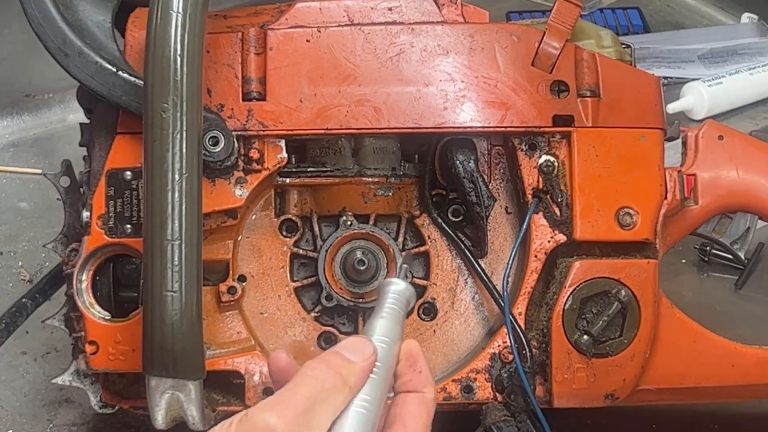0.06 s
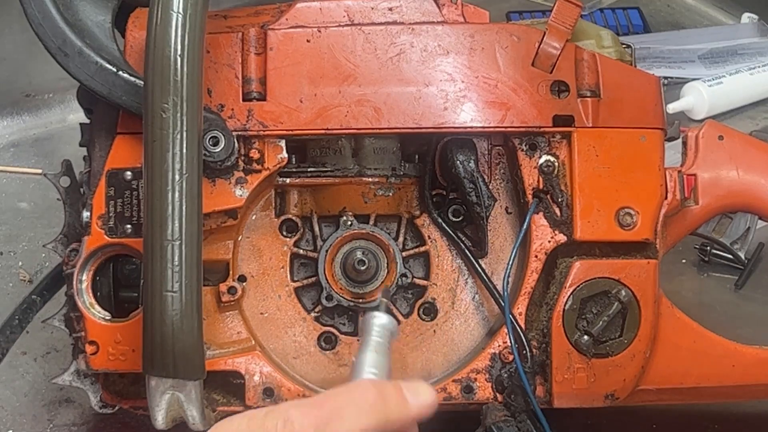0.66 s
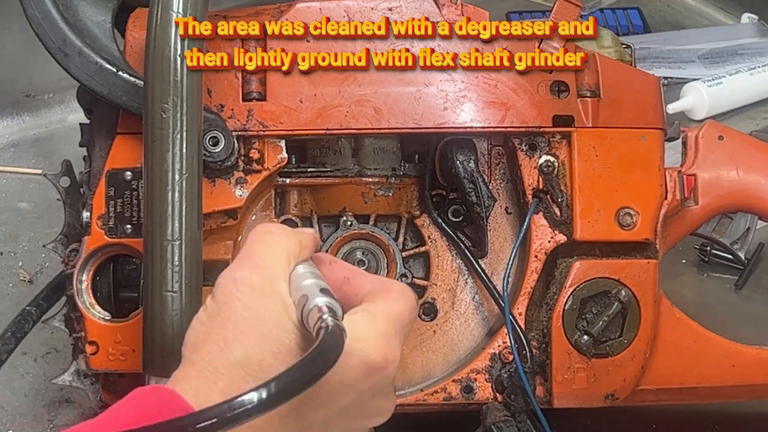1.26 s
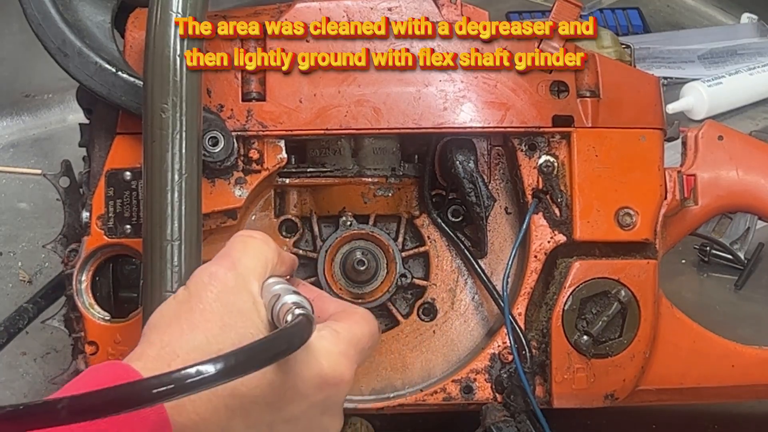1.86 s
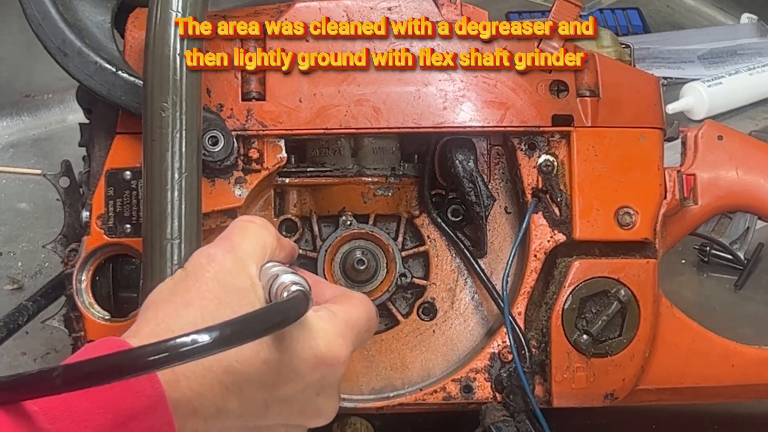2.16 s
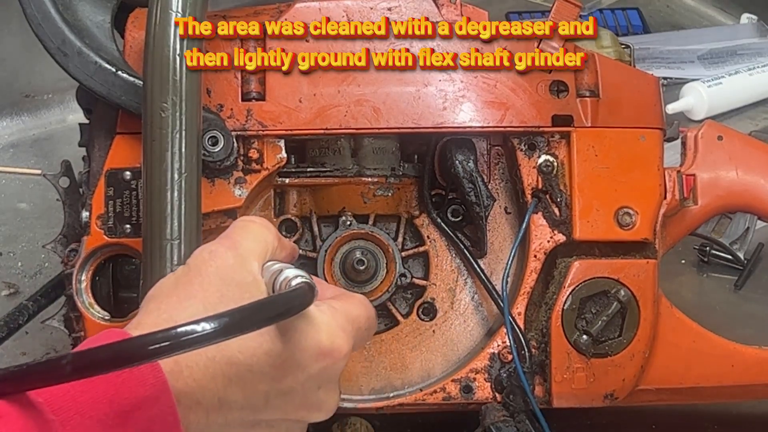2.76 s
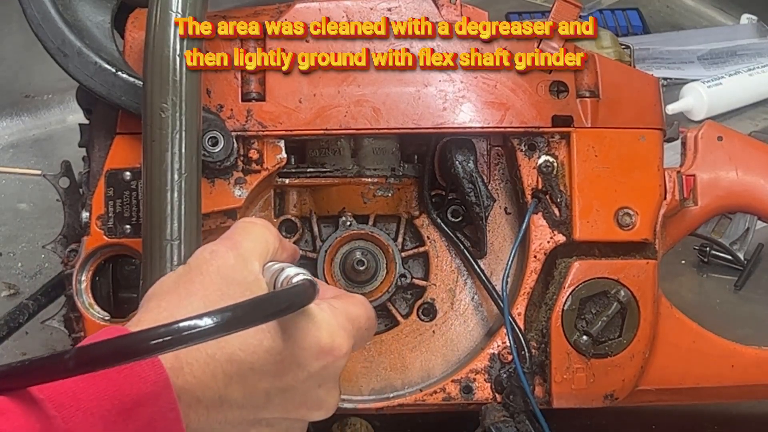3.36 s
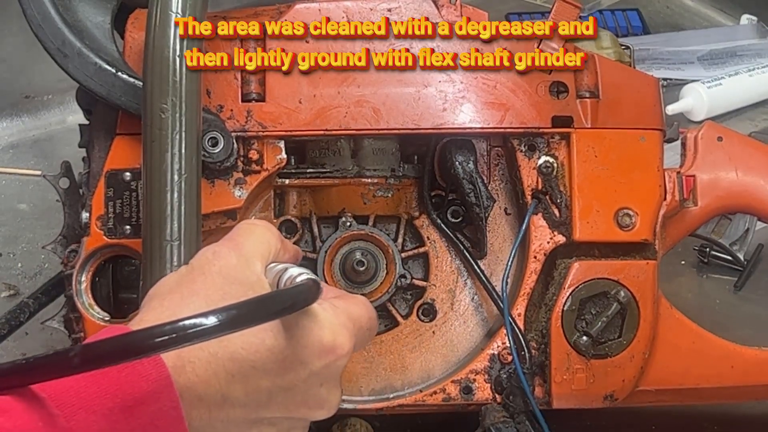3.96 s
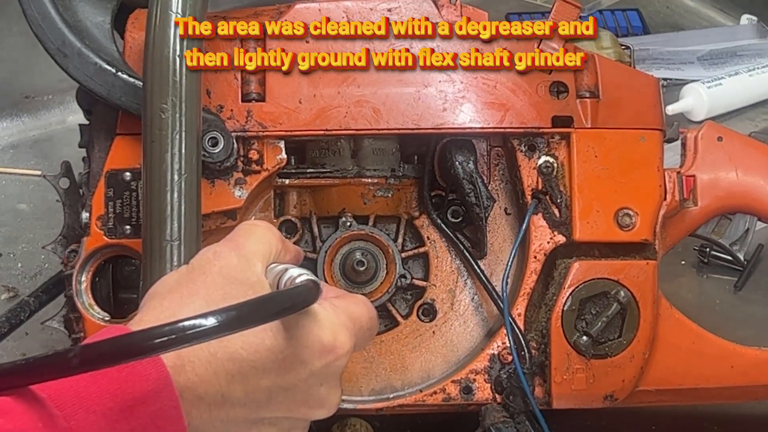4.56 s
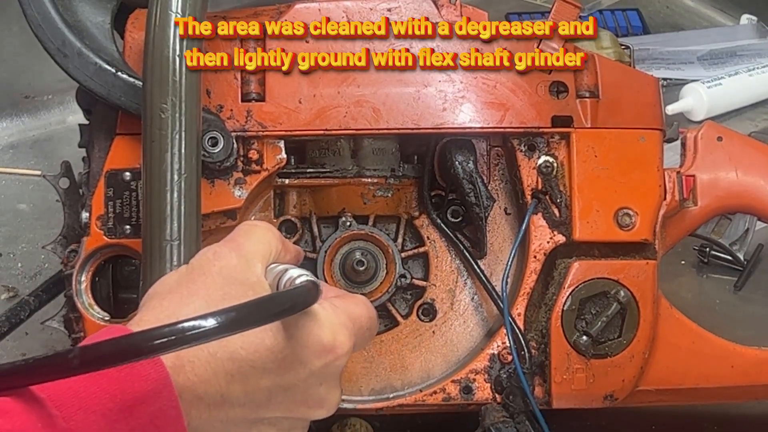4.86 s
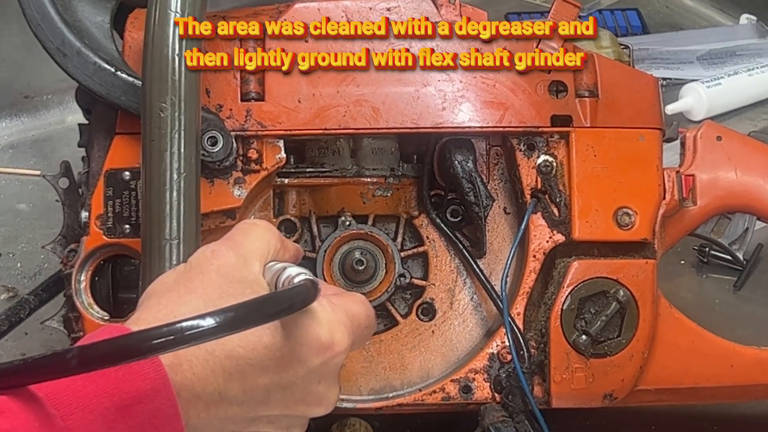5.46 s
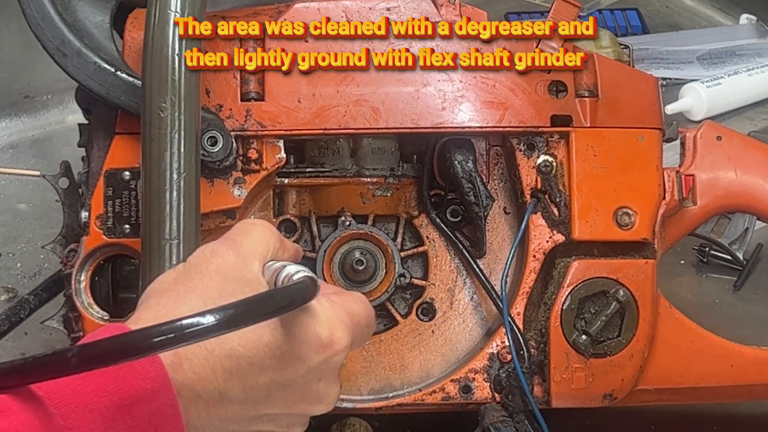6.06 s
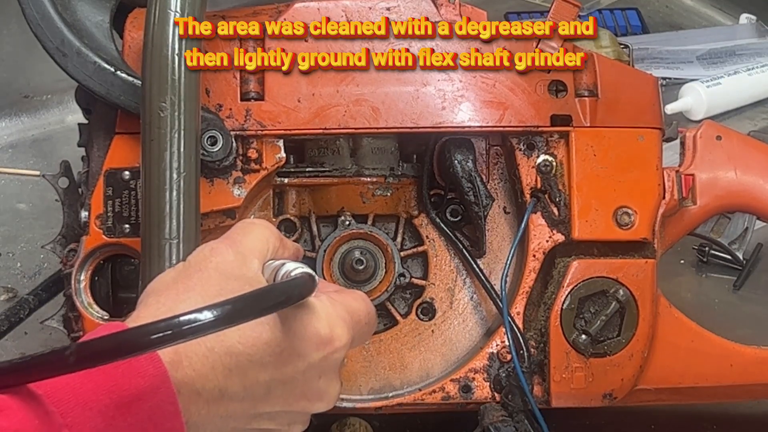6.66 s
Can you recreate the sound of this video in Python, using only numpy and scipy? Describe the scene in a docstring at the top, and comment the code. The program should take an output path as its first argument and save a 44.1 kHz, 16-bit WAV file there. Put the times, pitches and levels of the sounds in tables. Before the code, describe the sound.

In a small workshop, the electric motor of a flexible-shaft grinder coasts down briefly, then picks up to a steady high whine, with a raspy cable and rushing fan air. Its burr skims a chainsaw's metal crankcase, catching now and then, and near the end bites harder with chattering, ringing scrapes and a thin sizzle. The tool sounds close, over a faint low room rumble.

```python
"""A motor's whine sags as it coasts, then picks up and runs on: a pedal-driven flexible-shaft grinder
is cleaning a chainsaw's metal crankcase in a small workshop. Slots and commutator bars sing with the
shaft, the cable rasps in its sheath and the fan blows. The burr skims the casting, then chatters and
sizzles as it bites harder. A low rumble lies under it all."""
import sys
import numpy as np
from scipy import signal
from scipy.fft import rfft, irfft, next_fast_len
from scipy.io import wavfile
from scipy.ndimage import uniform_filter1d, map_coordinates

SR = 44100
rng = np.random.default_rng(int(sys.argv[2]) if len(sys.argv) > 2 else 0)


def dump(signal):
    """Clip the signal to [-1, 1] and save it as 16-bit WAV at the path in sys.argv[1]."""
    limited = np.clip(np.atleast_2d(signal).T, -1, 1)
    pcm = np.round(limited * 32767).astype(np.int16)
    wavfile.write(sys.argv[1], SR, pcm)


N = 295911

# The pedal's moves. Each row: time in seconds, speed in turns a second.
PEDAL = [(0.0, 146.6), (0.24, 120.27), (0.51, 103.45), (0.84, 142.67), (1.37, 189.0), (1.8, 199.42),
         (2.21, 232.95), (2.74, 238.92), (3.18, 222.26), (3.46, 213.05), (3.85, 206.08), (4.33, 212.77),
         (4.8, 224.79), (5.6, 238.16), (6.12, 243.41), (6.3, 242.95), (6.71, 247.02)]
def shaft():
    """Speed and angle of the rotor, whose inertia rounds off each pedal move."""
    inertia_s = .12
    speed = uniform_filter1d(curves(PEDAL)[0], int(inertia_s * SR), mode="nearest")
    return speed, 2 * np.pi * np.cumsum(speed * (1 + 0.0004 * wobble(12))) / SR


# EQ on the hum. Each row: frequency in Hz, gain in dB.
HUM_EQ = [(115, -14), (132, -8), (143, 0), (250, 0)]
def motor(angle, speed):
    """Unbalance hums once a turn, under the whine of the slots and the commutator."""
    power = ramp(start_s=0.35, length_s=0.15)  # coasting until the current comes back
    hum = amp(by_speed(speed, -50, per_doubling=10.6)) * whine(angle, flutter_db=0, blur=.03)
    singing = power * slots(angle) + commutator(angle, speed) + overtones(angle, speed)
    return filtered(hum, shape(HUM_EQ)) + walls(singing, wet_db=-18, t60=0.11)


# Fader ride on the slot whine. Each row: time in seconds, level in dB.
SLOT_FADER = [(0.5, -35), (0.9, -39.5), (1.3, -38.7), (1.7, -40.5), (2.02, -36.5), (2.3, -41), (2.7, -37.5),
              (2.9, -42.5), (3.3, -42.5), (3.7, -41.5), (4.1, -39.5), (4.5, -39), (4.75, -40), (5.1, -39),
              (5.5, -39), (6.71, -40)]
# The tones of the throb. Each row: offset in multiples of twice the mains rate, relative level in dB.
THROB_TONES = [(-1, -3), (0, 0), (1, -3.5), (2, -10)]
# How well the motor radiates this whine. Each row: frequency in Hz, gain in dB.
SLOT_EQ = [(1400, -24), (1700, -16.5), (1810, 3.5), (1900, -8), (2100, 0.5), (2380, 2.5), (2430, -2.5),
           (2480, 2), (2600, 2), (2700, 0), (2800, -4), (3000, -8)]
def slots(angle):
    """Twelve armature slots whine, throbbing unevenly with each half wave of the mains."""
    mains_hz = 60
    level_db, = curves(SLOT_FADER)
    passing = 12 * angle + .22 * wobble(260)  # the shaft judders
    half_wave = 2 * np.pi * 2 * mains_hz * np.arange(N) / SR
    tone = sum(amp(db) * whine(passing + k * half_wave, flutter_db=1.4, blur=.17)
               for k, db in THROB_TONES)
    return amp(level_db + 0.33 * wobble(11)) * filtered(unit(tone), shape(SLOT_EQ))


# Peaks and nulls of the motor's shell. Each row: centre in Hz, width in Hz, lift in dB.
SHELL_PEAKS = [(2560, 200, 2.5), (2740, 90, -9), (2950, 120, -9), (3380, 160, 2), (3620, 200, -4),
               (3990, 350, 4), (4430, 130, -7), (4620, 170, 8), (4995, 35, -7), (5150, 190, 4),
               (5340, 45, -9), (5440, 140, 6), (5530, 35, -10), (5615, 90, 5), (5678, 25, -4),
               (5728, 80, 8), (5792, 60, 10.5), (5850, 70, 7), (5930, 90, 10)]
# EQ on the commutator. Each row: frequency in Hz, gain in dB.
BAR_EQ = [(2400, -1.5), (3400, -1.5), (3900, 1), (4600, 0), (4830, -6), (5080, 1), (5400, 1), (5750, 0),
          (6150, 3), (6600, -4), (7100, 0), (8200, -2), (9200, -4), (10500, -2), (12200, 2), (14500, -3)]
def commutator(angle, speed):
    """Twenty-four bars whine under the brushes, swelling and fading as the pitch crosses resonances."""
    bars, bar_hz = 24 * angle, 24 * speed
    shell_db = sum(db * bell(bar_hz, hz, width) for hz, width, db in SHELL_PEAKS)
    bar_db = by_speed(speed, -46.7, per_doubling=2.8) + shell_db
    # at low speed each bar clicks, both straight through the air and through the handpiece
    slow = np.clip((240 - speed) / 100, 0, 1)
    click_db, direct_db = -47, -4
    clicks = sum(amp(db) * amp(2.5 * wobble(65)) * whine(k * bars, flutter_db=2.4, blur=1.0)
                 for k, db in [(2, 0), (3, -9)])
    clicks = filtered(slow * clicks, lambda hz: np.hypot(amp(direct_db), abs(modes(HANDPIECE_MODES, hz))))
    # running out of true adds a tone one order lower and presses the brushes harder once a turn
    side = .45 * slow * whine(bars - angle, flutter_db=2, blur=.35)
    pressure = 1 + (.22 + .25 * slow) * np.cos(angle)
    tone = whine(bars, flutter_db=2, blur=0.15 + .14 * slow)
    return filtered(pressure * (amp(bar_db) * (tone + side) + amp(click_db) * clicks), shape(BAR_EQ))


# A thin sheen on the whine. Each row: multiple of the shaft rate, level in dB before EQ.
SHAFT_OVERTONES = [(8, -55.5), (9, -49), (10, -59), (11, -67), (19, -46.5), (21, -47), (23, -54)]
# EQ on that sheen. Each row: frequency in Hz, gain in dB.
OVERTONE_EQ = [(1740, -10), (1810, 0), (1860, -10), (1930, 3.5), (2010, -7), (2130, 1), (2400, 1),
               (3800, -9), (4300, -6), (4530, 2.5), (4720, -5), (5080, 0.5), (5400, 1), (5750, 0)]
def overtones(angle, speed):
    """Faint overtones of the shaft come forward as it speeds up."""
    tones = sum(amp(db) * whine(round(k) * angle, flutter_db=2, blur=.3) for k, db in SHAFT_OVERTONES)
    return filtered(tones * (speed / speed.max()) ** 3, shape(OVERTONE_EQ))


# The sheath's bright rasp. Each row: frequency in Hz, gain in dB.
SHEATH_EQ = [(1000, -19.5), (1750, -10), (2150, -3.5), (3250, -2), (3450, -8.5), (3650, -4.5), (4000, -5),
             (4300, -3), (4530, -3), (4730, -4.5), (5080, -1.5), (5300, -2), (6300, -0.5), (7200, -10.5),
             (7650, -14), (7950, -9.5), (8500, -17.5), (9800, -17), (12500, -24), (15500, -49)]
# The steel handpiece's ring. Each row: pitch in Hz, width in Hz, gain in dB.
HANDPIECE_MODES = [(4284, 40, -6.5), (4400, 110, -14), (5067, 78, -4), (5620, 81, 0.5), (5997, 220, 2),
                   (6174, 225, 1), (6437, 150, -2)]
def cable(angle, speed, bite_ring):
    """The wound core rubs its sheath and shakes the handpiece once a turn; strokes smear at speed."""
    depth = np.clip(1.3 * (speed.min() / speed) ** 1.1, 0, 1)
    stroke = depth * np.cos(angle + 0.12 * wobble(28))
    grip = amp(1.16 * wobble(500))  # the coils catch and slip
    rasp_db = by_speed(speed, -34.5, per_doubling=7.8) + 0.22 * wobble(19)
    rasp = amp(rasp_db) * rush(shape(SHEATH_EQ), (1 + 0.022 * stroke) * grip)
    whip_db = 4.5 * bell(speed, centre=182, width=41)  # near this speed the cable whips
    shake_db = by_speed(speed, -40.5, per_doubling=3.7) + whip_db
    recoil = amp(-0.5) * bite_ring  # bites kick back into the handpiece
    shake = np.hypot(amp(shake_db), recoil) * amp(1.6 * wobble(25))
    return rasp + shake * rush(lambda hz: modes(HANDPIECE_MODES, hz), (1 + stroke) * grip)


# The burr digs in. Each row: start and length in seconds, then scrape, ring and sizzle levels in dB.
BURR_BITES = [(2.1, 0.034, -39, -46, -56), (2.867, .15, -52, -51, -63), (3.31, 0.03, -35, -46, -62),
              (4.123, 0.24, -38, -48, -49), (4.276, .045, -34, -40, -54), (5.21, 0.16, -38, -37.5, -60),
              (5.39, 0.17, -38.5, -39.5, -65), (5.503, 0.11, -37, -33.5, -57),
              (5.633, 0.069, -33.5, -33.5, -52), (5.727, 0.08, -31, -37.5, -52),
              (5.837, 0.39, -43, -44, -55), (6.153, 0.046, -29.5, -37, -37), (6.22, 0.066, -32, -41, -45),
              (6.28, 0.058, -32.5, -41, -41)]
def bites():
    """Envelopes of scrape, ring and sizzle: each bite digs in, holds and lets go."""
    attack_s, release_s = 0.015, 0.036
    holds = np.array([ramp(s, attack_s) * (1 - ramp(s + length, release_s))
                      for s, length, *_ in BURR_BITES])
    gains = amp(np.array(BURR_BITES)[:, 2:].T)
    return np.sqrt(gains ** 2 @ holds ** 2)


# Sharp ticks on edges. Each row: start in seconds, scrape level in dB, ring level in dB.
EDGE_CATCHES = [(2.119, -28, -40), (4.225, -28, -38), (4.304, -22, -38), (4.324, -20, -39),
                (4.837, -27, -38), (5.033, -28, -38), (5.041, -29, -38), (5.283, -31, -33),
                (5.499, -25, -23), (5.564, -23, -29), (5.661, -32, -21), (5.674, -22, -28),
                (5.687, -19, -21.5), (5.7054, -24, -25), (5.720, -24, -22), (5.735, -26, -24),
                (5.749, -30, -25), (5.7755, -28, -29), (5.807, -25, -30), (6.166, -22, -31),
                (6.173, -23, -28), (6.182, -26, -30), (6.195, -20, -33), (6.209, -24, -32),
                (6.257, -19, -30), (6.282, -28, -34), (6.294, -24, -26), (6.308, -26, -32),
                (6.311, -26, -40), (6.319, -20, -37), (6.33, -22, -33), (6.3435, -20.5, -33)]
def catches():
    """Envelopes of scrape and ring: a quick jolt each time the burr catches an edge."""
    start_s, *levels_db = np.transpose(EDGE_CATCHES)
    return [bursts((start_s * SR).astype(int), amp(db), t60=0.015) for db in levels_db]


# The scrape of burr on metal. Each row: frequency in Hz, gain in dB.
SCRAPE_EQ = [(500, -35), (2000, -2), (3100, -28), (3600, -10), (4000, -4.5), (4500, -2), (4750, -4),
             (5100, 3), (5400, -4), (5700, 8), (6000, 7), (6200, -0.5), (6450, 4.5), (6800, -1),
             (7300, -5.5), (8000, -14), (9500, -1.5), (11500, -18), (14500, -44)]
# The crankcase's ring. Each row: pitch in Hz, width in Hz, gain in dB.
CRANKCASE_MODES = [(2080, 150, -1.5), (2305, 180, 2), (2630, 250, -17), (2810, 210, -6), (3020, 220, 2),
                   (3283, 240, 1.5), (3670, 160, -2), (4360, 200, -8.5)]
# The sizzle of chips. Each row: frequency in Hz, gain in dB.
SIZZLE_EQ = [(6000, -30), (7200, -2), (7900, 2), (8700, -3), (9500, 10), (10400, -4), (11500, 1.5),
             (12400, -20), (13500, -12), (14500, -6), (15500, -25)]
def burr(angle, bite_scrape, bite_ring, bite_sizzle):
    """The burr scrapes unevenly once a turn, ringing the casting and sizzling as chips tear off."""
    touch_s, skim_scrape_db, skim_ring_db, lean_db_per_s = 0.69, -51, -44, 1.5
    touch = ramp(touch_s, length_s=1)  # the burr settles on the casting
    lean_db = lean_db_per_s * (np.arange(N) / SR - touch_s)  # the hand leans in
    scraping = np.hypot(touch * amp(skim_scrape_db + lean_db), bite_scrape)
    ringing = np.hypot(touch * amp(skim_ring_db), bite_ring)
    turns = np.flatnonzero(np.diff(np.floor(angle / (2 * np.pi))))
    chatter = unit(0.88 + bursts(turns, rng.uniform(size=len(turns)), t60=0.021))
    catch_scrape, catch_ring = catches()
    scrape = np.hypot(scraping * amp(0.85 * wobble(60) + wobble(2500)) * chatter, catch_scrape)
    ring = np.hypot(ringing * amp(1.1 * wobble(70)) * chatter, catch_ring)
    chip_sizes = amp(4 * rng.standard_normal(len(turns)))  # one chip a turn
    chips = unit(bursts(turns, chip_sizes, t60=0.014))
    sizzle = np.hypot(bite_sizzle * chips, amp(-18.5) * catch_scrape)
    return (struck(shape(SCRAPE_EQ), scrape)
            + struck(lambda hz: modes(CRANKCASE_MODES, hz), ring)
            + struck(shape(SIZZLE_EQ), sizzle))


# The fan's breath. Each row: frequency in Hz, gain in dB.
AIR_EQ = [(60, -36), (150, -9.5), (210, -14), (275, -9), (330, -6.5), (430, -6), (570, -9.5), (670, 3),
          (860, -1), (980, 0), (1100, -13), (1350, -7.5), (1800, -11), (4000, -28)]
# The motor housing's hollow ring. Each row: pitch in Hz, width in Hz, gain in dB.
HOUSING_MODES = [(333, 67, -8), (707, 52, -15), (1002.5, 31, 0), (1170, 43, -4.5), (1613, 24, -1)]
def fan(speed):
    """Cooling air rushes through the motor and rings its housing."""
    level_db = by_speed(speed, -40, per_doubling=9.3) + 0.54 * wobble(8)
    air = rush(shape(AIR_EQ))
    housing = amp(-5) * rush(lambda hz: modes(HOUSING_MODES, hz))
    return amp(level_db) * (air + housing)


# Fader ride on the rumble. Each row: time in seconds, level in dB.
RUMBLE_FADER = [(0.0, -49.5), (0.6, -48.5), (1.7, -46.5), (2.78, -48.5), (3.01, -44), (3.23, -51),
                (4.13, -44.5), (5.19, -51), (5.23, -44.5), (6.67, -48.5), (6.71, -50)]
# The rumble's weight. Each row: frequency in Hz, gain in dB.
RUMBLE_EQ = [(20, -30), (31, -6), (39, -1.5), (46, 8), (56, -3.5), (66, -3.5), (78, -4), (98, -18),
             (130, -23), (250, -53)]
# A resonance of the room. Each row: pitch in Hz, width in Hz, gain in dB.
ROOM_MODE = [(232.4, 29, 0)]
def workshop():
    """A low rumble and a faint drone fill the room."""
    rumble_db, = curves(RUMBLE_FADER)
    return amp(rumble_db) * rush(shape(RUMBLE_EQ)) + amp(-54) * rush(lambda hz: modes(ROOM_MODE, hz))


def walls(x, wet_db, t60):
    """Near walls answer, so a gliding tone beats with its own echo."""
    t = np.arange(SR // 4) / SR
    tail = rng.standard_normal(len(t)) * amp(-60 * t / t60)
    return x + amp(wet_db) * signal.fftconvolve(x, tail / np.linalg.norm(tail))[:N]


def whine(angle, flutter_db, blur):
    """A tone of rms near 1 whose level and phase flutter as the hanging motor shakes."""
    return np.sqrt(2) * amp(flutter_db * wobble(22)) * np.sin(angle + blur * wobble(70))


# Stereo width of the noise. Each row: frequency in Hz, left-right likeness (1 is mono).
LIKENESS = [(50, 1), (160, 0.11), (400, 0.79), (900, 0.8), (1250, 0.78), (1550, 0.053), (2200, 0.966),
            (4800, 1), (5700, 0.82), (7200, 1), (8600, 0.95), (10000, 1), (11500, 0.96), (13000, 0.97)]
def rush(colour, drive=1):
    """Stereo noise of rms 1, shaped in time by drive and then coloured by what it excites."""
    def response(hz):
        spread = np.arccos(np.clip(along(LIKENESS, hz), -1, 1)) / 2
        return colour(hz) * np.array([np.cos(spread), np.sin(spread)])
    mid, side = filtered(drive * rng.standard_normal((2, N)), response)
    return unit(np.array([mid + side, mid - side]))


def struck(colour, force):
    """Noise from a rough contact that follows force and rings on briefly after each jolt."""
    return np.sqrt(np.mean(force ** 2)) * rush(colour, force)


def bursts(at, sizes, t60):
    """Envelope of short scrapes that start at the given samples and die away."""
    t = np.arange(SR // 10) / SR
    return signal.fftconvolve(np.bincount(at, sizes, N)[:N], amp(-60 * t / t60))[:N]


def modes(table, hz):
    """Response of a body with (Hz, width, dB) resonances."""
    return sum((-1) ** k * amp(db) * 1j * hz * width / (centre * centre - hz * hz + 1j * hz * width)
               for k, (centre, width, db) in enumerate(table))


def by_speed(speed, working_db, per_doubling):
    """Level in dB of a part that grows louder with speed."""
    working_speed = 230  # turns a second
    return working_db + per_doubling * np.log2(speed / working_speed)


def filtered(x, response):
    """x through a complex frequency response."""
    size = next_fast_len(N + SR // 2)
    return irfft(rfft(x, size) * response(np.fft.rfftfreq(size, 1 / SR)), size)[..., :N]


def shape(eq):
    """Gain at any frequency from (Hz, dB) points."""
    return lambda hz: amp(along(eq, hz))


def along(points, hz):
    """(Hz, value) points read on a log axis."""
    freqs, values = np.transpose(points)
    return np.interp(np.log(hz + 1), np.log(freqs + 1), values)


def curves(rows):
    """One value per sample for each column after the time."""
    seconds, *columns = np.transpose(rows)
    return [np.interp(np.arange(N) / SR, seconds, column) for column in columns]


def wobble(rate):
    """A smooth random curve, rate knots a second."""
    return map_coordinates(rng.standard_normal(int(N * rate / SR) + 4), [np.arange(N) * rate / SR])


def ramp(start_s, length_s):
    """A straight fade from 0 to 1."""
    return np.clip((np.arange(N) / SR - start_s) / length_s, 0, 1)


def bell(x, centre, width):
    """1 at the centre, one half at half the width to either side."""
    return .5 ** ((2 * (x - centre) / width) ** 2)


def amp(db):
    """Decibels to gain."""
    return 10 ** (np.asarray(db) / 20)


def unit(x):
    """Scaled to rms 1."""
    return x / np.sqrt(np.mean(x ** 2) + 1e-20)


def scene():
    """One shaft turns every part of the tool, over the bed of the room."""
    speed, angle = shaft()
    bite_scrape, bite_ring, bite_sizzle = bites()
    tool = motor(angle, speed) + fan(speed) + cable(angle, speed, bite_ring)
    return tool + burr(angle, bite_scrape, bite_ring, bite_sizzle) + workshop()


# Phase between the sides. Each row: frequency in Hz, the left's lead in radians.
LEFT_LEAD = [(1300, 0), (1550, -1.6), (1850, 0), (5150, 0), (5700, -1), (6350, 0), (7550, 0), (8500, -1.4),
             (9050, -3), (10800, -3.3), (11900, -6.1), (13800, -6.3), (14600, -9.3)]
# Stereo balance. Each row: frequency in Hz, left minus right in dB.
BALANCE = [(60, -1), (110, -3), (200, -2.5), (370, -1.5), (690, 4), (1260, -3), (2320, 0.0), (4280, 0.0),
           (7870, 0.0), (14500, 0.0)]
def record(dry):
    """Left and right drift out of phase and differ in level by frequency; the very top is cut off."""
    top_hz = 15600
    half = np.array([[.5], [-.5]])  # split evenly between left and right
    stereo_skew = lambda hz: np.exp(1j * half * along(LEFT_LEAD, hz)) * amp(half * along(BALANCE, hz))
    return filtered(dry, lambda hz: stereo_skew(hz) * (hz < top_hz))


dry = scene()
out = record(dry)
dump(out)
```